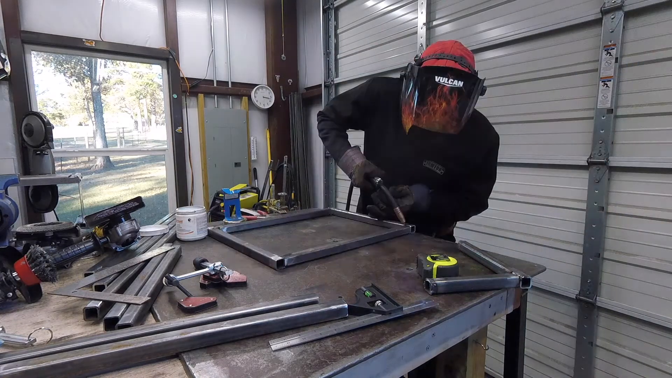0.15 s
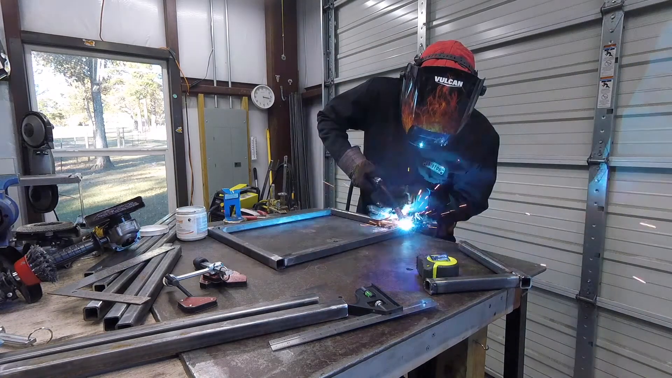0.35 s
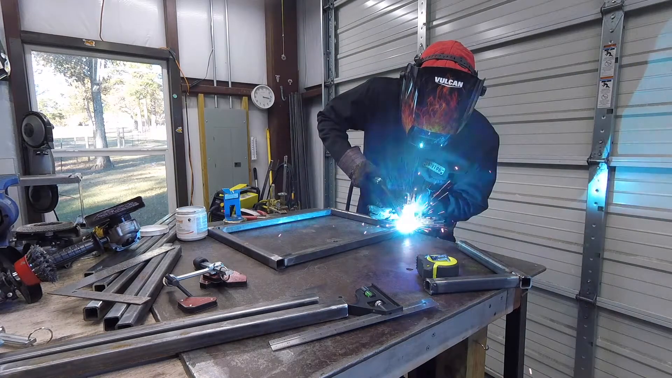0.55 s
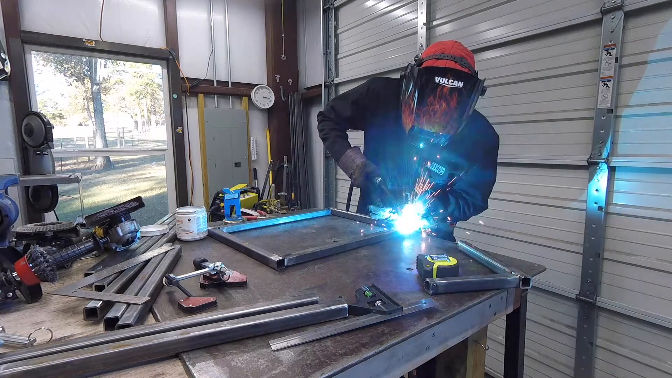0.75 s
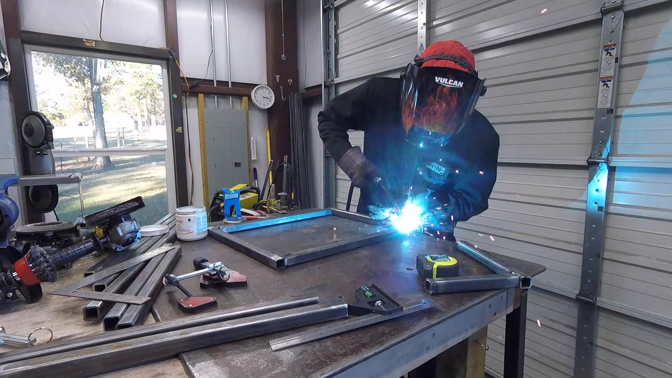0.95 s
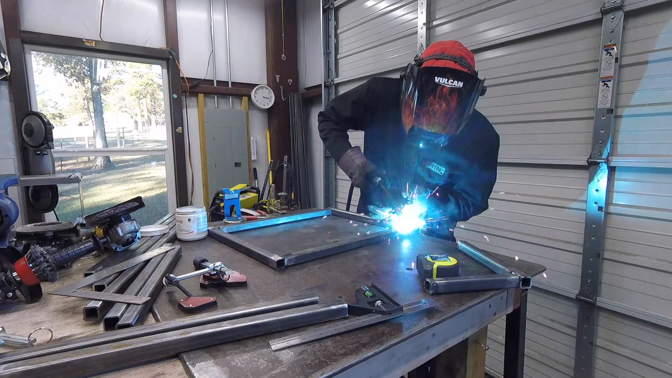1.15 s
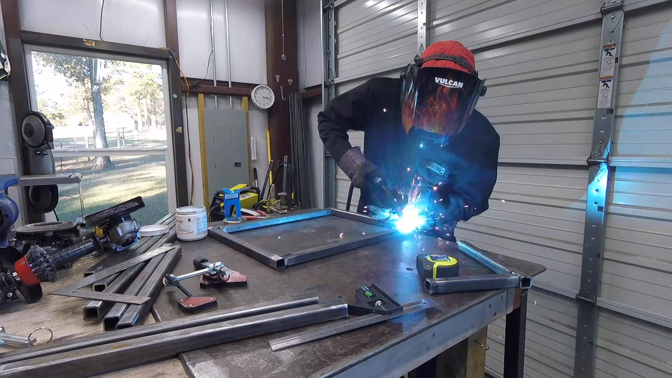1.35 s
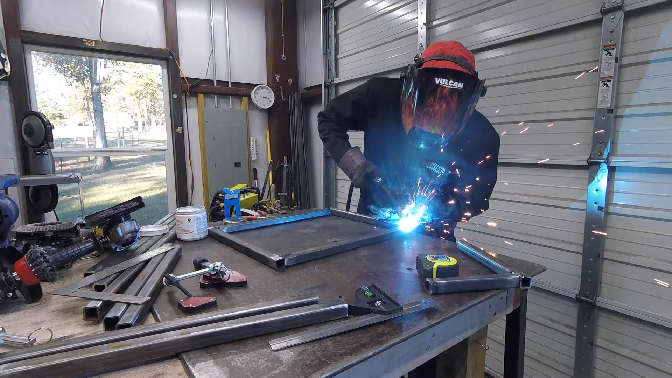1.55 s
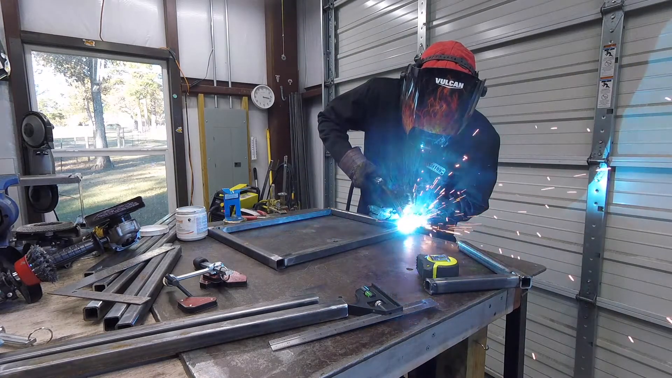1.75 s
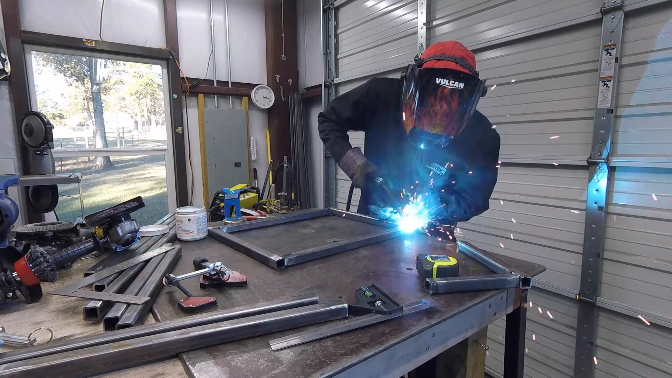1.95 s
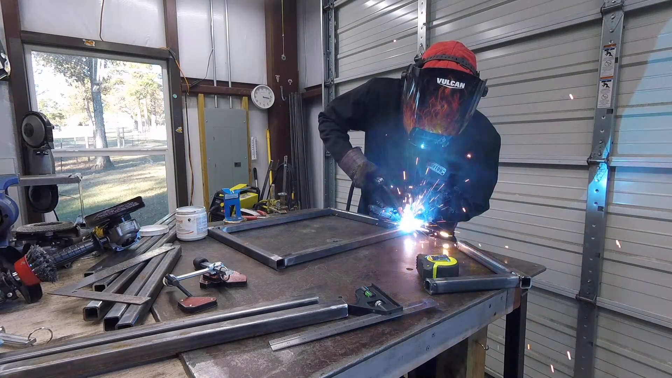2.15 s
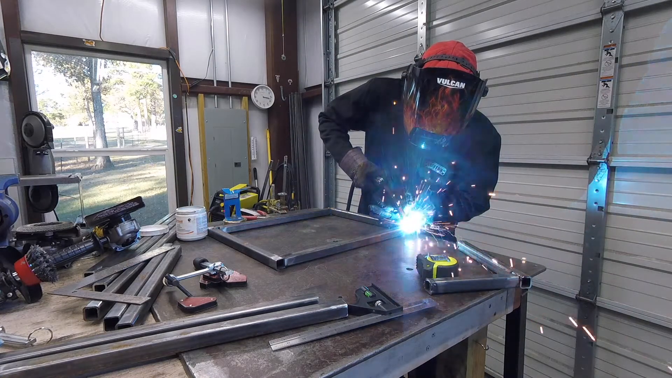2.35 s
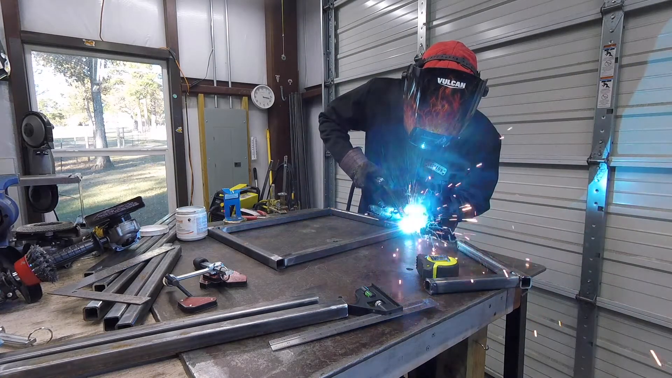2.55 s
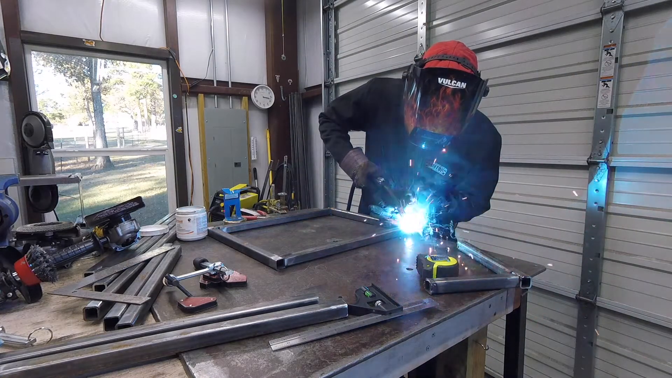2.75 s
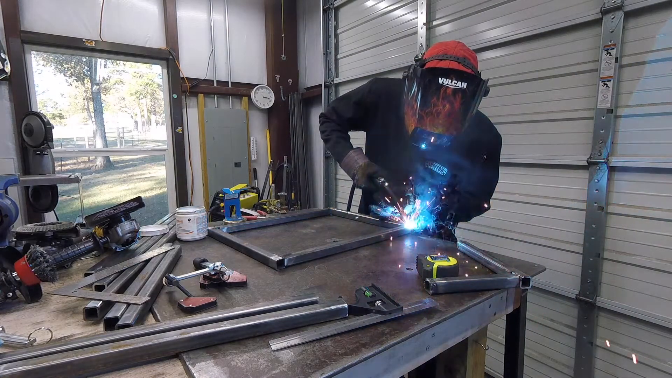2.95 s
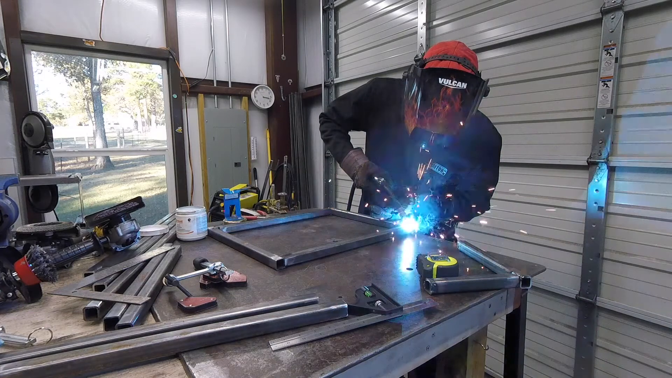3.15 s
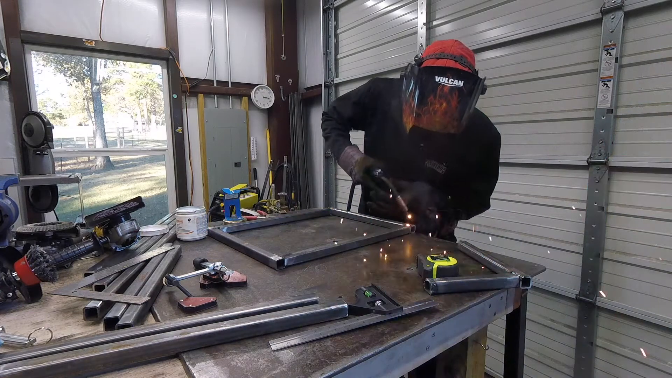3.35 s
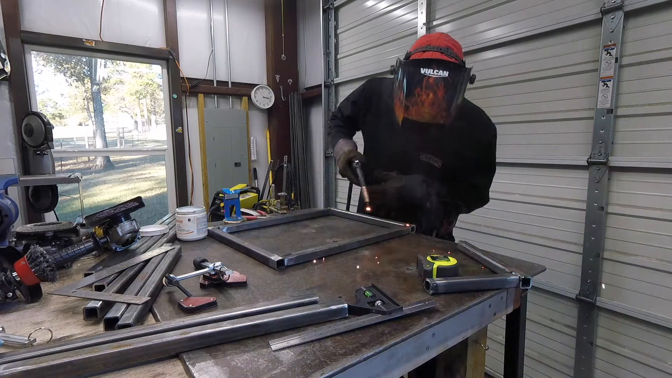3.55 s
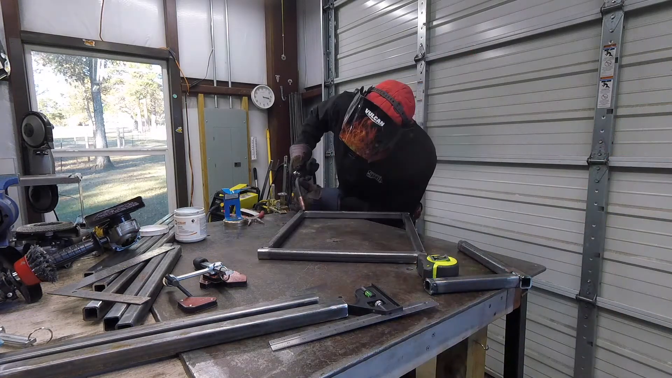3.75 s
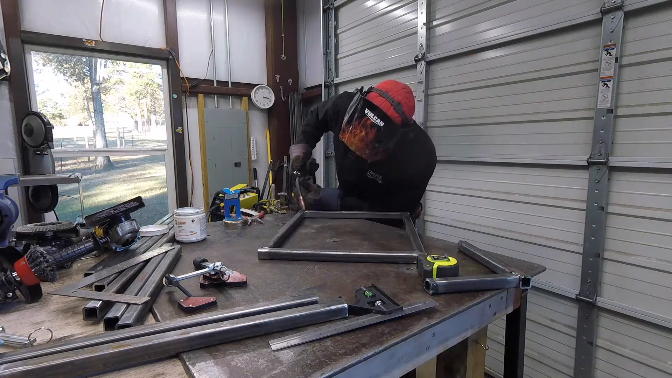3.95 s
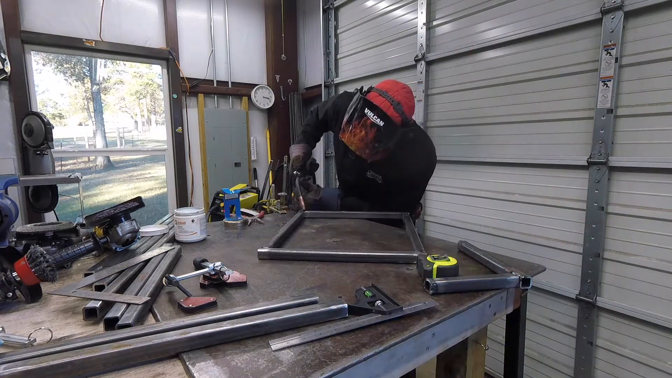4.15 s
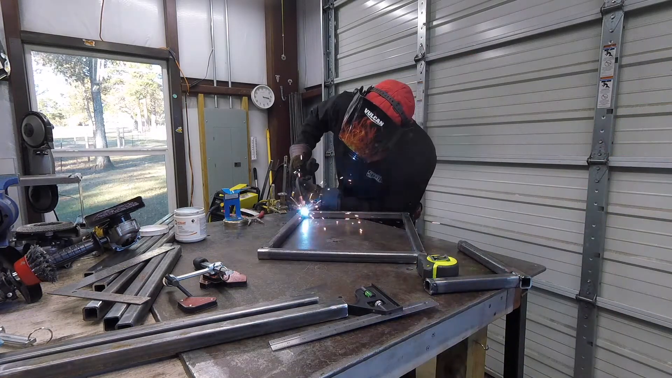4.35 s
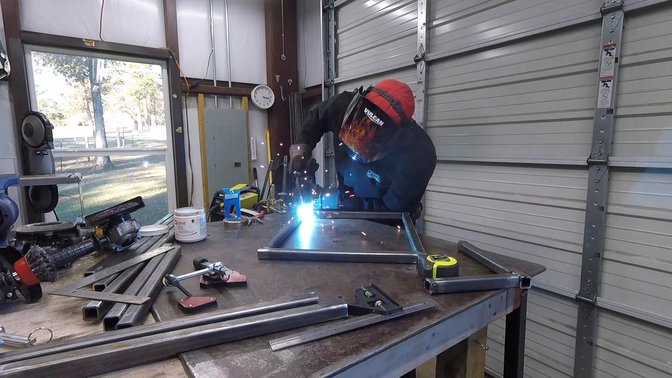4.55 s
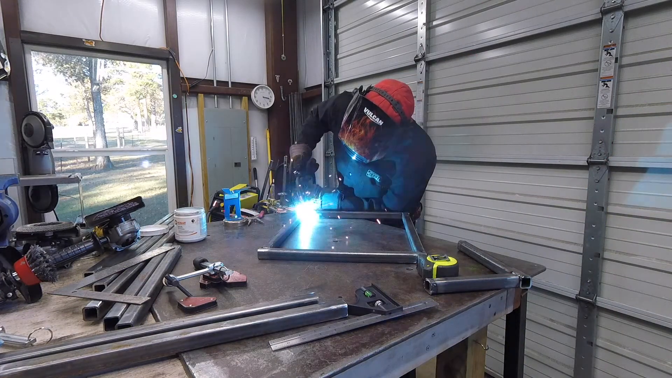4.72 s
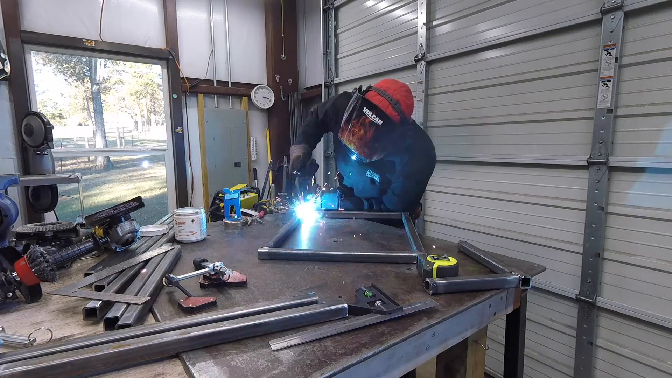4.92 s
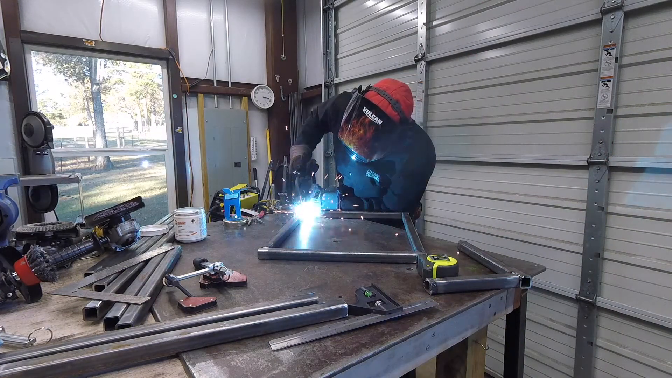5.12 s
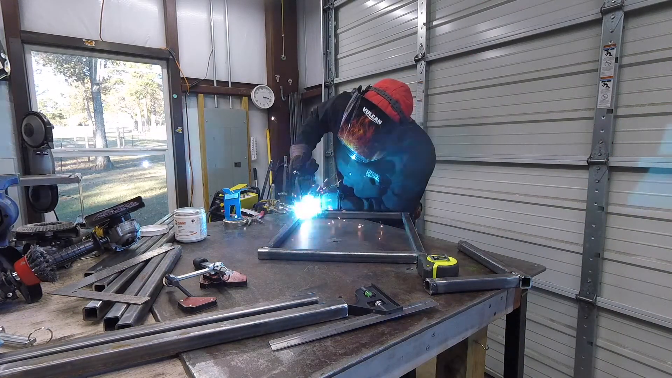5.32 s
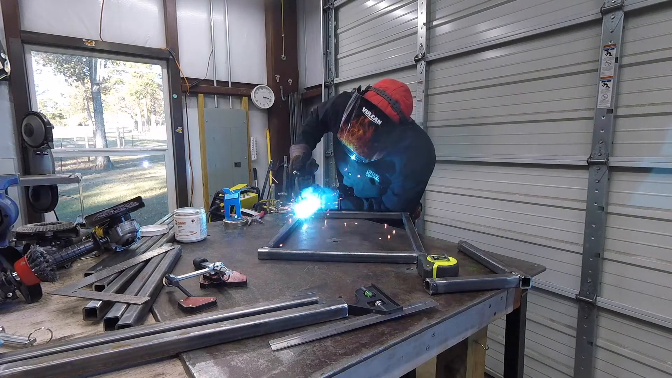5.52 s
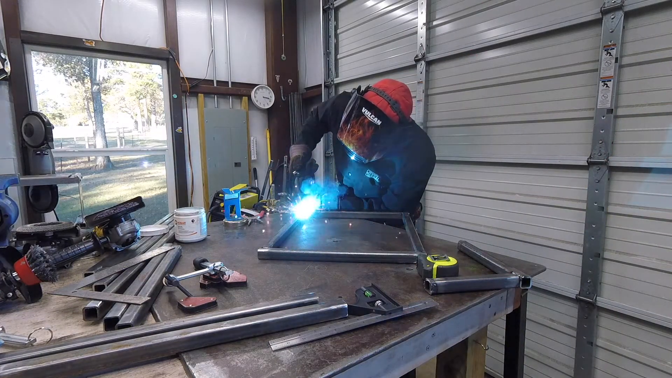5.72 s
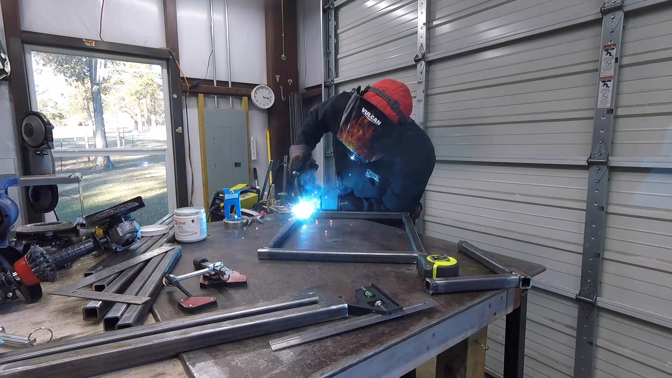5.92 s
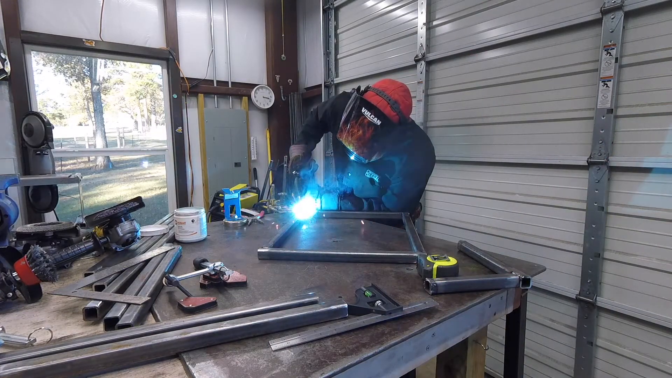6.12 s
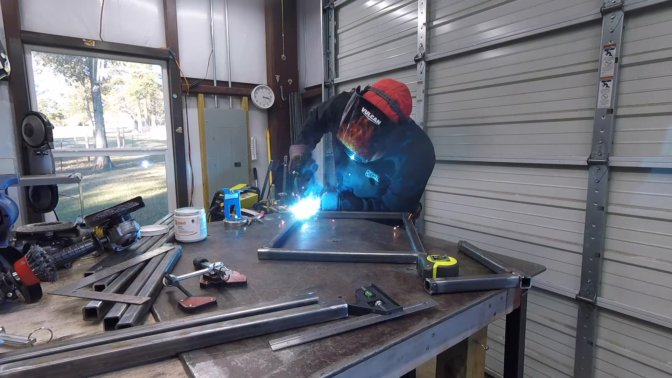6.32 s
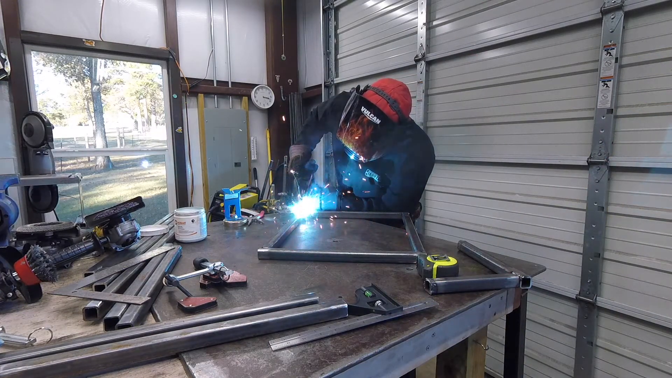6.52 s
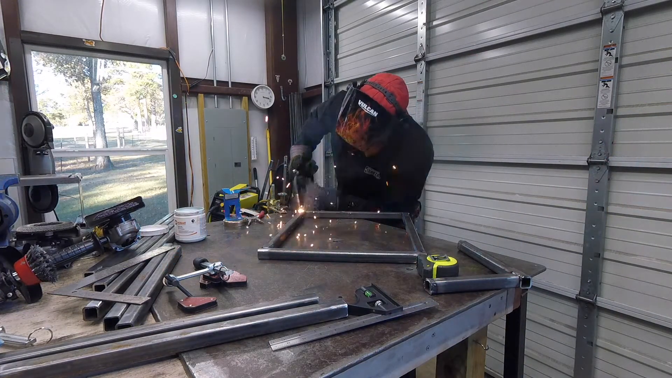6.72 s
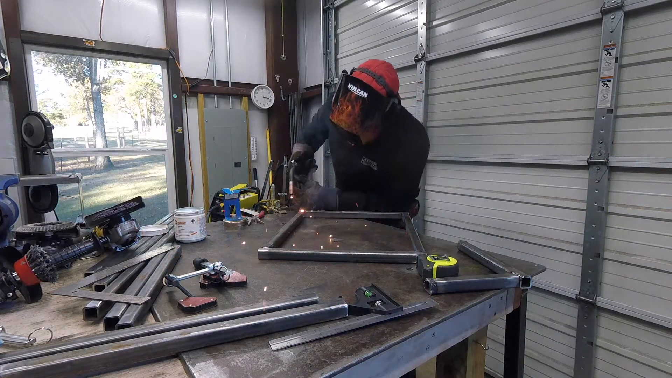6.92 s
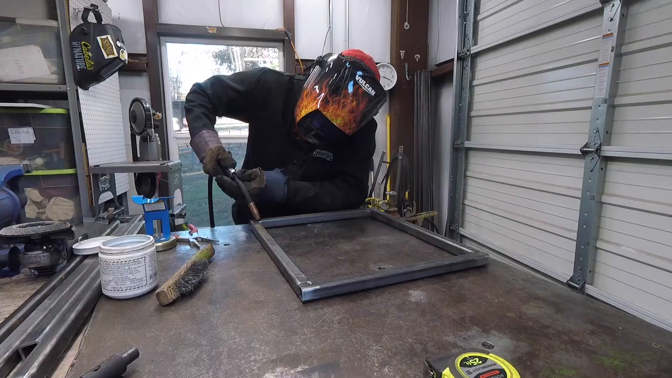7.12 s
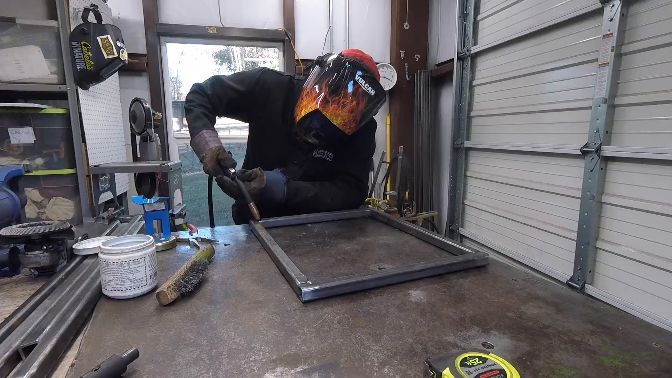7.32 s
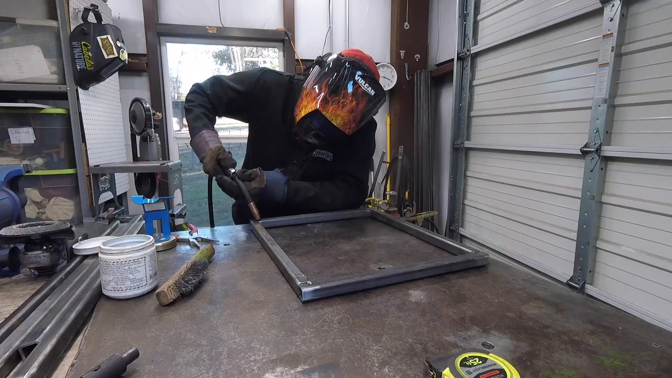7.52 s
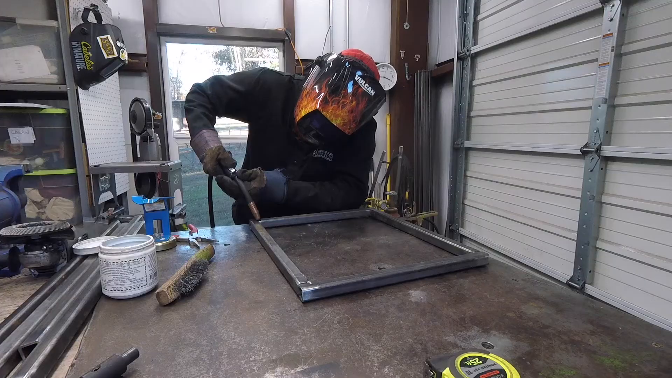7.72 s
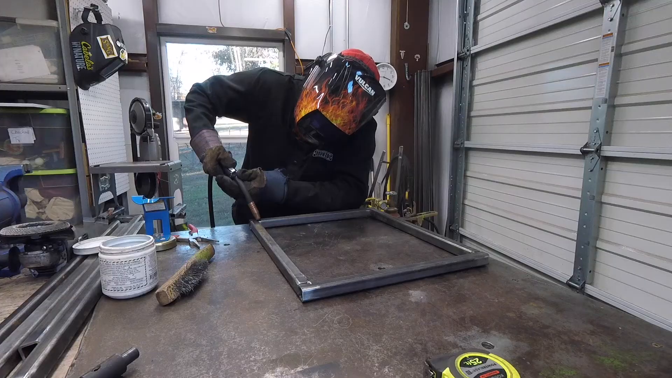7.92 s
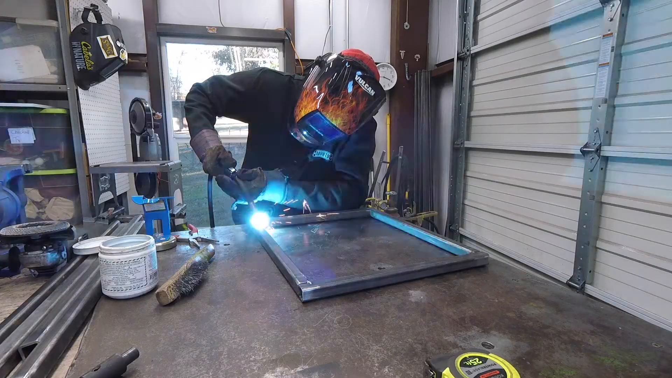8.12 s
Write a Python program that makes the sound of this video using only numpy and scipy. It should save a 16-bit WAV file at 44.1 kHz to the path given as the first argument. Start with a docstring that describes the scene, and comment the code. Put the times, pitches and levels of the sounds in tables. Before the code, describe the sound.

Dense, sharp electric welding crackle comes in two long bursts separated by hissing gas and a quiet fan whine, ending with a fresh arc strike.

```python
"""Gas is already hissing when a wire-feed welder in a metal-walled workshop strikes up and runs a first bead
on steel tubing: the wire dips over a hundred times a second, and each short circuit bursts with a pop.
A thin whistle lingers, the torch lifts and the gas stops; then gas, a puff and a second bead that starts a ring.
The hiss stops again, returns as heard from the third place, and a third arc is struck.
Pops are single impulses coloured by steel and room, gas is filtered noise, and a fan whines throughout."""
import sys
import numpy as np
from scipy import signal
from scipy.fft import rfft, irfft, next_fast_len
from scipy.io import wavfile
from scipy.ndimage import uniform_filter1d, minimum_filter1d, map_coordinates

SR = 44100
rng = np.random.default_rng(int(sys.argv[2]) if len(sys.argv) > 2 else 0)


def wav_record(signal):
    """Record a signal, one row per channel, as 16-bit PCM in the file named by sys.argv[1]."""
    frames = np.transpose(np.atleast_2d(signal))
    bounded = np.clip(frames, -1, 1)
    # unit amplitude maps onto the largest positive 16-bit level
    quanta = np.round(bounded * 32767).astype(np.int16)
    wavfile.write(sys.argv[1], SR, quanta)


N = 364707
TIME = np.arange(N) / SR
FFT_SIZE = next_fast_len(N + SR)   # spare room for ringing after the end
FREQS = np.maximum(np.arange(FFT_SIZE // 2 + 1) * SR / FFT_SIZE, 1)

# the microphone stands in three places: it is at the second and the third from these times [s]
SECOND_PLACE_S, THIRD_PLACE_S = 3.8, 7.14

# air noise of the machine's fan, before it is set to FAN_AIR_DB: (frequency [Hz], level [dB])
FAN_COLOUR = [(35, -71), (60, -29), (174, 0), (491, -12.5), (577, -9.5), (875, -15.5), (960, -14.5),
              (1210, -14.5), (1670, -17), (4210, -27), (5060, -20), (5430, -22.5), (15000, -36.5)]
FAN_AIR_DB = -51.5   # rms
# steady tones of the fan: (frequency [Hz], level [dB rms])
FAN_TONES = [(570, -61.5), (974.4, -60), (1136, -66)]
# two more fan tones, heard only from the third place: (frequency [Hz], level [dB rms])
NEAR_FAN_TONES = [(1626, -66), (4872, -62.5)]

# the gas valve: (opens [s], closes [s])
VALVE_TIMES = [(-0.3, 3.695), (3.912, 7.135), (7.76, 8.4)]
# pressure stored in the hose escapes first, as a surge over the steady flow
SURGE_RISE_S, SURGE_FALL_DB_PER_S, VALVE_SHUT_S = 0.019, 38, 0.0054
SURGE_DB, STEADY_DB = -30.5, -52.5   # gain on the hiss, before the level of each place
# colour of the hiss at the first two places: (frequency [Hz], level [dB])
HISS_COLOUR = [(300, -24), (800, -24), (1350, -13), (1600, -6), (1820, 4.5), (2150, -11.5), (2700, -15),
               (4400, -11.5), (5400, 5), (6800, 4), (7800, -8.5), (10500, -11), (11800, -31), (13800, -26),
               (15000, -40)]
# colour of the hiss at the third place: (frequency [Hz], level [dB])
NEAR_HISS_COLOUR = [(300, -30), (800, -16), (1300, -14), (1650, 5), (1850, 2), (2150, -7.5), (3100, -12),
                    (4500, -11), (5200, 5.5), (6600, 1), (7700, 1), (8600, -7), (10400, -2), (11800, -28),
                    (13600, -19), (15000, -32)]
# the hiss starts flat by this share of its pitch, slides up and brightens
HISS_SAG, HISS_GLIDE_S, HISS_SWELL_S = 0.18, 0.034, 0.021
# the nozzle is lifted off the first bead: (time [s], height [m], change of the hiss [dB])
TORCH_LIFT = [(3.1, .14, -3), (3.33, .143, -2.5), (3.42, .152, 1), (3.46, .164, 1), (3.5, .187, .5),
              (3.55, .21, 0), (3.7, .215, -1)]
NOZZLE_BOUNCE = 0.64   # share of the hiss that survives a trip to the steel and back
# colour of the low gas flutter: (frequency [Hz], level [dB])
FLUTTER_COLOUR = [(100, -14), (165, 9), (230, 1.5), (330, -7), (450, -19), (620, -8), (850, -3),
                  (1300, -21), (2500, -41)]
# low flutter over the first bead [dB], and flutter that goes with any flow [dB against the hiss gain]
POOL_FLUTTER_DB, FLOW_FLUTTER_DB = -49.5, -18.5
# the gas shield puffs out as the second arc catches, a chirp and a sizzle over a thump:
# (start [s], length [s], start pitch [Hz], end pitch [Hz], width [Hz], level [dB])
GAS_PUFFS = [(4.236, 0.042, 1450, 880, 450, -28.5), (4.228, 0.052, 6000, 4200, 3800, -24.5),
             (4.244, 0.046, 330, 150, 220, -26.5)]
# a whistle lingers after the first bead, with levels before it fades:
# (start [s], end [s], pitch [Hz], level [dB], octave level [dB])
THIN_WHISTLE = (3.11, 3.43, 946, -48, -50.5)
WHISTLE_FADE_DB_PER_S, WHISTLE_RISE_HZ_PER_S = 25, 14

# the beads: (start [s], end [s], spread of the time from dip to dip [share])
BEADS = [(0.281, 3.034, .09), (4.385, 6.58, .14)]
# how the arc runs along the beads:
# (time [s], share of dips that short [0-1], energy of a pop [dB], dips of the wire [per s])
ARC_COURSE = [(0.3, 0.72, 4.5, 190), (0.5, 0.76, 11.5, 200), (0.7, 0.58, 13.5, 179), (0.95, 0.8, 1.5, 198),
              (1.25, .76, 3, 207), (1.38, 0.48, 7, 184), (1.8, 0.56, 1, 191), (2.05, 0.78, 4, 186),
              (2.35, 0.86, 1, 178), (2.7, 0.76, 6.5, 188), (3.0, 0.72, 3.5, 207), (4.3, .66, 7, 199),
              (4.5, .76, 9, 200), (4.65, 0.74, 10, 202), (5.05, .8, 12, 212), (5.28, 0.67, 9, 196),
              (5.45, 0.93, 4.5, 231), (5.78, 0.96, 7, 185), (6.0, 0.65, 8, 181), (6.2, 0.89, 7, 203),
              (6.55, 0.83, 2, 193)]
# single pops given their own time: sputters as an arc starts, and pops that end a lull:
# (pop [s], quiet before it [s], energy [dB])
TIMED_POPS = [(0.2916, .008, 7), (0.3046, .005, 7.5), (0.3246, .018, 9), (0.332, .006, 7),
              (0.3483, .015, 9), (0.3857, .012, 9), (0.3968, .01, 10), (0.4082, .01, 9),
              (1.1513, .015, 8.5), (1.345, .015, 11), (1.3757, .013, 9.5), (1.3865, .009, 9),
              (1.4443, .02, 5), (1.471, .026, 8), (1.488, .017, 7.5), (1.6738, .015, 9), (1.7307, .02, 7.5),
              (2.127, .016, 9), (2.168, .016, 8.5), (2.4846, .015, 9.5), (2.7011, .016, 7.5),
              (2.7895, .016, 8), (4.2863, .008, 3), (4.2912, .004, 6.5), (4.2992, .007, 6),
              (4.3097, .009, 8), (4.3166, .006, 7.5), (4.3227, .005, 11.5), (4.333, .008, 4.5),
              (4.3423, .008, 9), (4.3554, .012, 7), (4.3683, .012, 8.5), (4.3801, .011, 9),
              (4.4454, .013, 10.5), (4.566, .02, 8.5), (4.6063, .016, 9.5), (5.98, .02, 5.5),
              (6.6002, .023, 6.5)]
# cracks and thuds as the arc strikes, spits or breaks, and ticks of metal and torch:
# (time [s], energy [dB], extra low body [dB])
CRACKS_AND_TICKS = [(0.1125, 5.5, 7), (0.124, 10, -0.5), (0.2537, 3.5, -1.5), (0.257, -2, -6),
                    (3.041, -4, -5), (3.0763, 11.5, -3.5), (3.217, -28, 19), (3.783, -32, -5),
                    (3.914, -28, 13), (4.2272, 10, -2), (4.2288, 8, -6), (4.2315, 3, -8), (4.244, 1, -2),
                    (4.2485, 1, 2), (4.256, 2, -4), (4.2625, 8, -2), (4.268, 7.5, -1), (4.2755, 6, 0),
                    (5.043, 6.5, 7), (5.142, -1, 5), (5.278, 0, 11), (6.144, -2, 1), (7.638, -34, -10),
                    (7.769, -24, 16), (8.0486, 1.5, 16.5), (8.2399, -13, -10), (8.2444, 13, 1.5),
                    (8.2603, 8.5, 8)]
DIP_WANDER = 0.05    # slow drift of the beat, as a share
MELT_SPREAD = 0.15   # chance in how soon a drop is ready, in drops
POP_SPREAD_DB = 1.5  # scale of the chance in a pop's energy
POP_GROWTH_DB = 1.88   # gain per doubling of the time its drop had to grow
# as the torch turns, the nozzle shades the arc more or less: (time [s], treble [dB], low body [dB])
TORCH_SHADE = [(.3, -1.5, -1.5), (1.1, -4, -0.5), (1.6, -2, -1), (3.0, -2.5, -3.5), (4.3, 1, -1.5),
               (5.0, -1, -1), (5.6, -4, -0.5), (6.5, -0.5, 1.5), (8.2, 7, 32)]

# colour of a pop in the first weld: (frequency [Hz], level [dB])
FIRST_POP_COLOUR = [(100, -39), (145, 6), (225, 0.5), (320, -2), (450, -9.5), (800, -4.5), (1500, 0.5),
                    (2400, -5), (3800, -5.5), (4600, -3.5), (5250, 8), (6000, 9), (7100, -3.5), (9000, -8),
                    (10900, -7), (11900, -25.5), (15000, -29)]
# colour of a pop in the later welds: (frequency [Hz], level [dB])
LATER_POP_COLOUR = [(100, -26.5), (150, 2.5), (230, -7.5), (400, -8.5), (900, -3.5), (1150, -8),
                    (2300, -7.5), (3700, -11), (4500, -2), (5300, 10.5), (6000, 1), (6800, -2), (7300, -8),
                    (10100, -11), (11000, -18), (11800, -25), (15000, -36)]
# resonances of frame and bench at the first place: (frequency [Hz], width [Hz], boost [dB])
FIRST_RESONANCES = [(393, 11, 3), (576, 61, 8), (763, 34, 7.5), (915, 12.5, 10.5), (1230, 15, 5),
                    (1488, 22, 5), (1716, 56, 4), (1936, 38, 7.5), (2200, 73, 7.5), (2566, 76, 7),
                    (2576, 45, 1), (2896, 14, 9), (4770, 17, 8), (13230, 810, 10)]
# the same at the second place: (frequency [Hz], width [Hz], boost [dB])
LATER_RESONANCES = [(310, 110, 3.8), (554, 52, 2.4), (860, 240, 2.4), (1494, 53, 7.5), (1794, 154, 7.5),
                    (6530, 270, 3.6), (9150, 300, 5.1)]
# the same at the third place: (frequency [Hz], width [Hz], boost [dB])
NEAR_RESONANCES = [(298, 80, 4.2), (1610, 130, 11.3), (2380, 130, 1.9), (3050, 220, 4.5), (6100, 480, 5.3),
                   (10000, 900, 5)]
# where echoes off the bench cancel the pop, first place: (frequency [Hz], width [Hz], cut [dB])
FIRST_DIPS = [(1940, 87, -4), (2670, 100, -16), (2975, 61, -4), (3350, 160, -3), (3635, 150, -3),
              (4340, 130, -8), (6820, 370, -5)]
# the same at the second place: (frequency [Hz], width [Hz], cut [dB])
LATER_DIPS = [(1330, 56, -28), (2054, 180, -22), (2270, 100, -11), (3030, 90, -4), (3480, 220, -5)]
# one ring of the frame grows as the second bead goes on: (time [s], added gain [factor])
FRAME_RING_GROWTH = [(5.1, 0.085), (5.8, 1), (6.6, 0.8)]
RING_HZ, RING_WIDTH_HZ = 1810, 35
# how long the workshop echoes: (frequency [Hz], time to fall by 60 dB [s])
ROOM_DECAY = [(200, 0.02), (1500, 0.54), (5500, 0.6), (12000, 0.15)]
# how loud it echoes: (frequency [Hz], level against the pop sent into the room [dB])
ROOM_LEVEL = [(180, -4.5), (500, -5.5), (1500, -6), (4000, -4), (5500, -12.5), (8000, 0), (12000, -1)]


def from_db(db):
    """Decibels to gain."""
    return 10 ** (np.asarray(db) / 20)


def rms_one(x):
    """Scale to rms 1."""
    return x / np.sqrt(np.mean(x ** 2) + 1e-20)


def at_time(rows, t=TIME, axis=1):
    """Read one column of a table at any time, with straight lines between its rows."""
    rows = np.array(rows)
    return np.interp(t, rows[:, 0], rows[:, axis])


def at_hz(points, hz=FREQS):
    """Read a spectrum at any frequency, on a log-frequency axis."""
    f, value = np.transpose(points)
    return np.interp(np.log(hz), np.log(f), value)


def filtered(x, response):
    """Pass a sound through a frequency response."""
    return irfft(rfft(x, FFT_SIZE) * response, FFT_SIZE)[:N]


def above(x, hz, order=2):
    """The part of a sound above a frequency."""
    return signal.sosfilt(signal.butter(order, hz, "high", fs=SR, output="sos"), x)


def delayed(x, delay_s):
    """The same sound a little later."""
    return filtered(x, np.exp(-2j * np.pi * FREQS * delay_s))


def noise(gain):
    """Noise of a given colour, rms 1."""
    return rms_one(filtered(rng.standard_normal(N), gain))


def resonance(hz, width_hz):
    """Response of one resonance, 1 at its peak."""
    return 1 / (1 + 1j * (FREQS ** 2 - hz ** 2) / (FREQS * width_hz))


def causal(spectrum):
    """Minimum-phase response: a sharp front, all ringing afterwards."""
    cepstrum = irfft(np.log(from_db(at_hz(spectrum))), FFT_SIZE)
    cepstrum[1:FFT_SIZE // 2] *= 2
    cepstrum[FFT_SIZE // 2 + 1:] = 0
    return np.exp(rfft(cepstrum))


def clicks(times, sizes):
    """One impulse for each event."""
    samples = np.clip(np.round(times * SR).astype(int), 0, N - 1)
    return np.bincount(samples, sizes, N)


def fan(wander):
    """Rushing air and steady tones; the tones follow the slight wander of the fan's speed."""
    speed = 1 + wander * noise(1 / (1 + (FREQS / 10) ** 2))
    turns = np.cumsum(speed) / SR

    def tones(table):
        """Sum of sine tones at their rms levels."""
        return sum(from_db(db) * np.sqrt(2) * np.sin(2 * np.pi * hz * turns) for hz, db in table)

    air = from_db(FAN_AIR_DB) * noise(from_db(at_hz(FAN_COLOUR)))
    return air + tones(FAN_TONES) + tones(NEAR_FAN_TONES) * (TIME > THIRD_PLACE_S)


def gas_flow():
    """Each opening gives a surge that sinks to a steady flow until it shuts: gains of (hiss, flutter)."""
    hiss = flowing = 0
    for opens, closes in VALVE_TIMES:
        age = np.maximum(TIME - opens, 0)
        shut_age = np.maximum(TIME - closes, 0)
        gate = (1 - np.exp(-age / SURGE_RISE_S)) * np.exp(-shut_age / VALVE_SHUT_S)
        surge = from_db(SURGE_DB - SURGE_FALL_DB_PER_S * age)
        hiss = hiss + gate * np.hypot(surge, from_db(STEADY_DB))
        flowing = flowing + gate
    pool_flutter = from_db(POOL_FLUTTER_DB) * flowing * (TIME < SECOND_PLACE_S)
    return hiss, np.hypot(pool_flutter, from_db(FLOW_FLUTTER_DB) * hiss)


def nozzle_hiss(spectrum, split_hz=7800):
    """As gas starts, the nozzle's resonances slide up, and the bright hiss swells later than the hollow part."""
    opens = np.array(VALVE_TIMES)[:, 0]
    age = TIME - opens[np.searchsorted(opens, TIME) - 1]
    pitch = 1 - HISS_SAG * np.exp(-age / HISS_GLIDE_S)
    jet = noise(from_db(at_hz(spectrum)))
    top = filtered(jet, 1 / (1 + (split_hz / FREQS) ** 10))
    # reading the lower part at a changing speed slides its pitch
    hollow = map_coordinates(jet - top, [np.cumsum(pitch)], order=3, mode="mirror")
    hiss = top + hollow
    return hiss - above(hiss, 1900, order=1) * np.exp(-age / HISS_SWELL_S)


def puff(edge_s=0.007):
    """Short puffs of gas at ignition: bands of noise, each gliding down in pitch."""
    out = 0
    for start, length_s, from_hz, to_hz, width_hz, db in GAS_PUFFS:
        pitch = np.interp(TIME - start, [0, length_s], [1, to_hz / from_hz])
        gate = np.clip(np.minimum(TIME - start, start + length_s - TIME) / edge_s, 0, 1)
        read_s = np.cumsum(pitch * (TIME > start)) / SR
        breath = gate * np.interp(read_s, TIME, noise(resonance(from_hz, width_hz) ** 2))
        # the level holds for the length of the puff, not for the whole sound
        out = out + from_db(db) * rms_one(breath) * np.sqrt(length_s * SR / N)
    return out


def whistle(edge_s=0.03, waver=0.006):
    """A slightly unsteady tone with its octave, creeping up in pitch as it fades."""
    start, end, hz, db, octave_db = THIN_WHISTLE
    age = np.maximum(TIME - start, 0)
    gate = np.clip(np.minimum(age, end - TIME) / edge_s, 0, 1) * from_db(-WHISTLE_FADE_DB_PER_S * age)
    unsteady = 1 + waver * noise(1 / (1 + (FREQS / 20) ** 2))
    phase = 2 * np.pi * np.cumsum((hz + WHISTLE_RISE_HZ_PER_S * age) * unsteady) / SR
    return gate * (from_db(db) * np.sin(phase) + from_db(octave_db) * np.sin(2 * phase))


def gas(first_db, later_db, near_db):
    """Gas hisses and flutters; bouncing between steel and nozzle, it whistles downwards as the torch lifts."""
    hiss = nozzle_hiss(HISS_COLOUR)
    trip_s = 2 * at_time(TORCH_LIFT) / 343   # to the steel and back at the speed of sound
    echo = sum(NOZZLE_BOUNCE ** k * np.interp(TIME - k * trip_s, TIME, hiss) for k in (1, 2, 3))
    lift_db = at_time(TORCH_LIFT, axis=2) * (TIME > TORCH_LIFT[0][0])
    first = from_db(first_db + lift_db) * (hiss + echo)
    later = from_db(later_db) * hiss
    near = from_db(near_db) * nozzle_hiss(NEAR_HISS_COLOUR)
    hiss = np.select([TIME < SECOND_PLACE_S, TIME < THIRD_PLACE_S], [first, later], near)
    hiss_gain, flutter_gain = gas_flow()
    flutter = flutter_gain * noise(from_db(at_hz(FLUTTER_COLOUR)))
    return hiss_gain * hiss + flutter + puff() + whistle()


def workshop(x, build_s):
    """A diffuse tail that builds up from the walls and dies band by band."""
    t, tail = TIME[:SR], np.zeros(SR)
    edges = np.geomspace(90, 17000, 13)
    for low, high in zip(edges, edges[1:]):
        hz = np.sqrt(low * high)
        band_pass = signal.butter(2, [low, high], "band", fs=SR, output="sos")
        band = signal.sosfilt(band_pass, rng.standard_normal(SR))
        band *= from_db(-60 * t / at_hz(ROOM_DECAY, hz)) * (1 - np.exp(-(t / build_s) ** 2))
        share = np.sqrt(2 * (high - low) / SR)   # wider bands carry more energy
        tail += band / np.linalg.norm(band) * share * from_db(at_hz(ROOM_LEVEL, hz))
    return signal.oaconvolve(x, tail)[:N]


def scatter(x, pops, level_db, delay_s, decay_s, fresh, count=251, size=128):
    """Near reflections: part of their random pattern stays, a share is drawn anew for each pop."""
    t = TIME[:SR // 25]
    shape = (t > delay_s) * np.exp(-t / decay_s)
    lasting = np.sqrt(1 - fresh) * rng.standard_normal(len(t))
    new = np.sqrt(fresh) * rng.standard_normal((count, len(t)))
    echoes = shape * (lasting + new)
    echoes /= np.linalg.norm(echoes, axis=1, keepdims=True)
    # cut the sound just ahead of each pop and pick a pattern for each piece
    edges = np.unique(np.r_[0, (pops[:, 0] - 0.001) * SR, N].astype(int))
    out = np.zeros(N + len(t))
    for start, end in zip(edges, edges[1:]):
        pattern = echoes[start // size % count]
        out[start:end + len(t) - 1] += signal.fftconvolve(x[start:end], pattern)
    return from_db(level_db) * out[:N]


def ring(x, spectrum, modes):
    """Give impulses the colour of a pop and the peaks and notches of the steel, keeping their energy."""
    response = causal(spectrum)
    for hz, width_hz, db in modes:
        response = response * (1 + (from_db(db) - 1) * resonance(hz, width_hz))
    return filtered(x, response / np.sqrt(np.mean(np.abs(response) ** 2)))


def smear(x, hz, width_hz):
    """Around the main resonance the sound arrives a little late, so that a pop swells for a few cycles."""
    return filtered(x, (2 * resonance(hz, width_hz) - 1) ** 2)


def dip_times(start, jitter, count=700, size=10):
    """The wire dips at a loose beat that drifts as the hand moves."""
    chance, drift = rng.standard_normal((2, count))
    beats = np.exp(jitter * chance + DIP_WANDER * rms_one(uniform_filter1d(drift, size)))
    dips = np.cumsum(at_time(ARC_COURSE, axis=3)) / SR
    dip_counts = np.interp(start, TIME, dips) + np.cumsum(beats) - beats[0]
    return np.interp(dip_counts, dips, TIME)


def short_circuits():
    """A dip shorts only when a drop is ready; a drop that grew longer pops louder: (time [s], energy [dB])."""
    rows = [(s, db) for s, quiet_s, db in TIMED_POPS]
    for start, end, jitter in BEADS:
        s = dip_times(start, jitter)
        dips_per_s = at_time(ARC_COURSE, s, axis=3)
        melted = np.cumsum(at_time(ARC_COURSE, s)) + MELT_SPREAD * rng.standard_normal(len(s))
        drops = np.maximum.accumulate(np.floor(melted))
        shorts = (np.diff(drops, prepend=-np.inf) > 0) & (s < end)
        for pop_s, quiet_s, _ in TIMED_POPS:   # no other short just before or after a timed pop
            shorts &= (s < pop_s - quiet_s) | (s > pop_s + 0.5 / dips_per_s)
        db = at_time(ARC_COURSE, s, axis=2)
        db = db + POP_SPREAD_DB * (np.euler_gamma - rng.gumbel(size=len(s)))
        # growing time of each drop, counted in dips
        grown = np.clip(np.diff(s[shorts], prepend=0) * dips_per_s[shorts], 0.5, 2.5)
        rows += zip(s[shorts], db[shorts] + POP_GROWTH_DB * np.log2(grown))
    return np.array(sorted(rows))


def bursts(pops, body_spread_db, body_hz):
    """Pressure impulses of all pops and strikes, each with its own amount of low body."""
    chance = rng.standard_normal(N)[:len(pops)]
    body = at_time(TORCH_SHADE, pops[:, 0], axis=2) + body_spread_db * chance
    events = np.vstack([np.column_stack([pops, body]), CRACKS_AND_TICKS])
    s, energy_db, body_db = events.T
    low_pass = signal.butter(2, body_hz, fs=SR, output="sos")
    # the tiny offset keeps the filter from slowing down in silence
    extra = signal.sosfilt(low_pass, clicks(s, from_db(energy_db) * (from_db(body_db) - 1)) + 1e-18)
    return clicks(s, from_db(energy_db)) + extra


def arc(first_db, later_db, near_db, near_room_db, treble_hz):
    """The crackling arc: bursts of metal drops with their near reflections, ringing steel and the room."""
    pops = short_circuits()
    x = smear(bursts(pops, body_spread_db=1.5, body_hz=3330), hz=5300, width_hz=2400)
    treble = filtered(x, 1 / (1 + (treble_hz / FREQS) ** 10))
    # the shortest waves reach the microphone mostly by way of the small parts around the torch
    off_parts = scatter(treble, pops, level_db=-0.8, delay_s=0, decay_s=0.002, fresh=0.85)
    glitter = from_db(-7) * treble + off_parts
    x = x - treble + from_db(at_time(TORCH_SHADE)) * delayed(glitter, 0.0003)
    off_torch = scatter(above(x, 1500), pops, level_db=-11, delay_s=0.0003, decay_s=0.0012, fresh=0.9)
    off_bench = scatter(x, pops, level_db=-11.5, delay_s=0.0024, decay_s=0.007, fresh=0.7)
    x = x + off_torch + off_bench
    off_frame = -0.27 * delayed(above(x, 3000), 0.0016)   # one clear echo at the first place

    at_first = TIME < SECOND_PLACE_S
    at_third = TIME >= THIRD_PLACE_S
    first = ring((x + off_frame) * at_first, FIRST_POP_COLOUR, FIRST_RESONANCES + FIRST_DIPS)
    first = from_db(first_db) * first
    later = ring(x * ~at_first * ~at_third, LATER_POP_COLOUR, LATER_RESONANCES + LATER_DIPS)
    later = from_db(later_db) * later
    later = later + at_time(FRAME_RING_GROWTH) * filtered(later, resonance(RING_HZ, RING_WIDTH_HZ))
    near = from_db(near_db) * ring(x * at_third, LATER_POP_COLOUR, NEAR_RESONANCES)
    room = workshop(first + later + from_db(near_room_db) * near, build_s=0.0041)
    return first + later + near + room


def scene():
    """Arc, gas and fan at one microphone."""
    crackling = arc(first_db=0.2, later_db=0.8, near_db=0.8, near_room_db=1.0, treble_hz=7300)
    hissing = gas(first_db=1.5, later_db=0.5, near_db=-1.0)
    background = fan(wander=0.001)
    return (crackling + hissing + background)[None]


def gain_control(x, threshold_db, release_db_per_s, attack_s, size=1201):
    """The recorder turns down just after a loud pop, holds for a moment (size, in samples) and recovers."""
    over_db = np.maximum(20 * np.log10(np.abs(x) + 1e-9) - threshold_db, 0)
    over_db = -minimum_filter1d(-over_db, size, origin=size // 2)   # hold the highest value
    release_db = release_db_per_s * TIME
    held_db = np.maximum.accumulate(over_db + release_db, axis=-1) - release_db
    keep = np.exp(-1 / (attack_s * SR))
    return x * from_db(-signal.lfilter([1 - keep], [1, -keep], held_db))


def record(dry, low_cut_hz=118, floor_db=-79, top_cut_hz=15500):
    """The bass is cut down to a faint floor, loud pops duck the gain, tall peaks are rounded, the top is cut."""
    floor = from_db(floor_db) * noise(1 / (1 + (FREQS / low_cut_hz) ** 2))
    x = above(dry, low_cut_hz, order=12) + floor
    x = gain_control(x, threshold_db=-5.5, release_db_per_s=123, attack_s=0.007)
    x = x / (1 + (x / 0.93) ** 6) ** (1 / 6)   # peaks bend towards 0.93
    return signal.sosfilt(signal.ellip(10, 0.1, 90, top_cut_hz, fs=SR, output="sos"), x)


dry = scene()
out = record(dry)
wav_record(out)
```